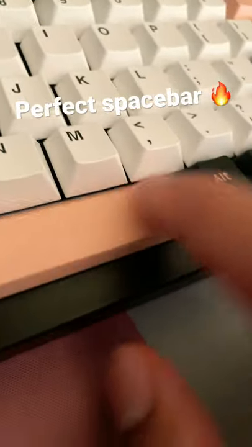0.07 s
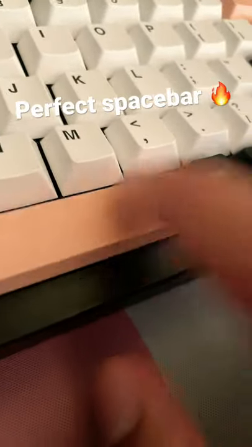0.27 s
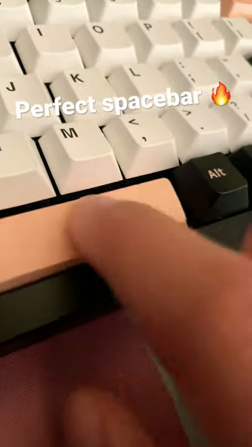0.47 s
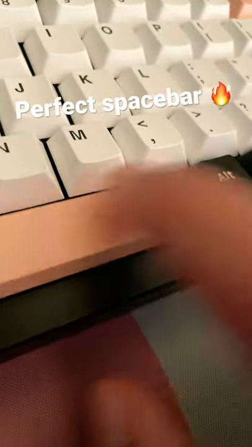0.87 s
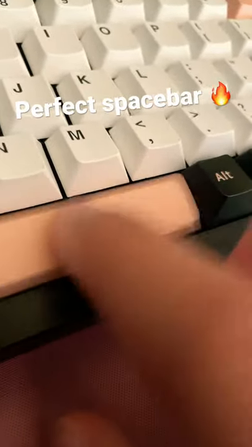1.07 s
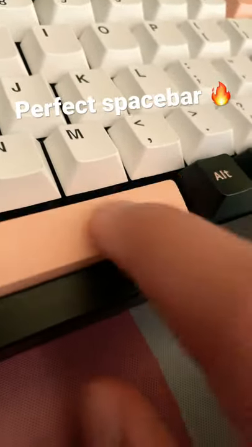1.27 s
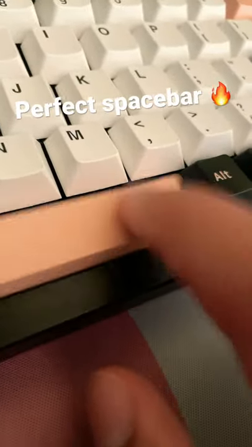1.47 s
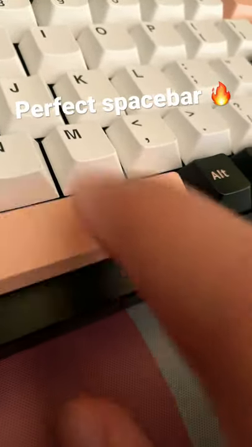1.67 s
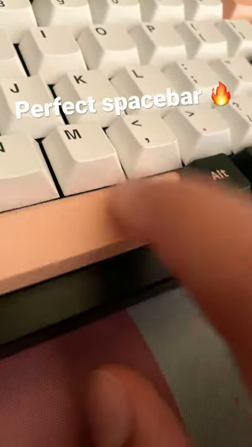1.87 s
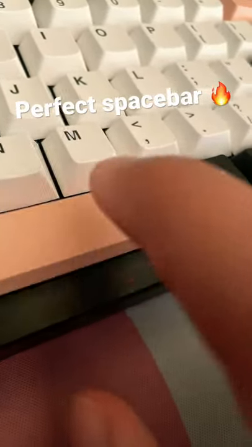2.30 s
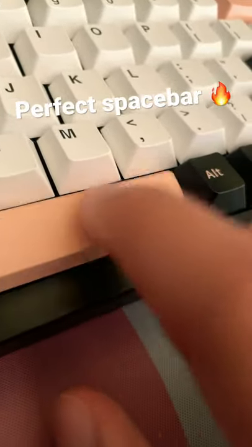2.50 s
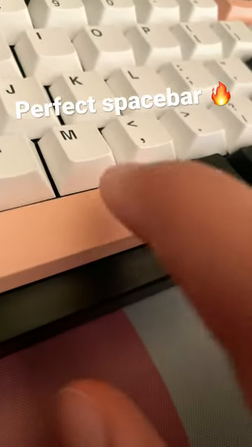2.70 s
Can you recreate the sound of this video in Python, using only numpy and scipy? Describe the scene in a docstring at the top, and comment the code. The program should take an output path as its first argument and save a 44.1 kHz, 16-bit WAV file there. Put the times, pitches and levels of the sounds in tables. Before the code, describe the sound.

A mechanical keyboard spacebar clacks close by from the start, about six presses a second. Each press is a dry, low plastic clack, followed within a tenth of a second by a lighter, hollow tick as it springs back. The run continues evenly until 2.2 seconds, pauses, then a release at 2.5 and a final press at 2.6 follow. A faint low rumble fills the small, quiet room.

```python
"""Over a low room rumble, the spacebar of a mechanical keyboard clacks close by, about six times a second. Each
press drives the bar against its bottom stop, and the impact excites damped modes of bar, plate and case. On
release the spring throws it against its top stop, where it ticks and then wobbles with a hollow knock. The
finger brushing the key adds faint rubs before some releases, and a small quiet room answers every stroke."""
import sys
import numpy as np
from scipy import signal
from scipy.fft import rfft, irfft
from scipy.io import wavfile

SR = 44100
rng = np.random.default_rng(int(sys.argv[2]) if len(sys.argv) > 2 else 0)


def transcribe(u):
    """Save the signal u as a 16-bit wav file named by the first command-line argument.

    u: samples, shape (n,) or (channels, n), limited to [-1, 1]; the rate is SR.
    q: integer samples, one column per channel.
    """
    v = np.clip(np.atleast_2d(u).T, -1, 1)
    q = np.round(v * 32767).astype(np.int16)
    wavfile.write(sys.argv[1], SR, q)


N = 125685

# spectrum of the steady room rumble: frequency_hz, relative_db
RUMBLE_COLOUR = [(20,-20),(35,-10),(50,-9),(75,-0.5),(130,2),(200,-5.5),(300,-6.5),(500,-17),(1000,-32.5),(2500,-42.5),(6000,-49.5),(13000,-51),(16000,-49.5)]
# friction spectrum of the sliding stem: frequency_hz, relative_db
STEM_COLOUR = [(200,-5.5),(600,4),(1200,-7),(2000,-8.5),(2800,-0.5),(4000,-22.5),(7500,-12.5),(10000,-38.5),(16000,-27)]
# impacts on the bottom stop: start_s, strength_db, crack_db, knock_db, ping_db, ping_hz
PRESS_STROKES = [(0.0166,-17,-6.5,4,-3,2730),(0.158,-10.5,-3,-3,1,2695),(0.3017,-2.9,-0.5,2.5,1,2720),(0.458,-5,-4.7,2.5,3.5,2757),(0.6088,-9.5,1,3.5,5.5,2734),(0.7538,-5,-4.5,1.5,-1.5,2755),(0.9103,-10,-1,6.5,6,2770),(1.068,-2.2,1.5,1,0,2820),(1.2236,-2.5,-0.8,2.5,-5.5,2700),(1.391,-3,-3.5,-0.5,1,2730),(1.5556,-1.5,-0.8,-1.5,1,2770),(1.722,-4,-2,0.5,-0.6,2807),(1.8829,-4,-3,1,-.5,2746),(2.042,-6.5,-0.5,3.5,3.5,2750),(2.2101,-6,-1.8,5,3,2735),(2.5745,-11,-2,1.5,4.1,2760)]
# modes of bar, plate and case with the key down: pitch_hz, level_db, t60_s
PRESS_MODES = [(228,-43,0.059),(310,-36.5,0.055),(429,-43.5,0.049),(895,-17.5,0.0068),(1071,-18.5,0.021),(1284,-22,0.018),(1481,-21,0.018),(1761,-33.5,0.042),(2223,-21.5,0.0067),(3560,-49,0.039),(3658,-29,0.0083)]
# spectrum of the contact crack at the bottom stop: frequency_hz, relative_db
PRESS_CRACK = [(300,-25),(1400,14.5),(3000,5.5),(4500,-1),(6000,-12),(7000,-11.5),(8200,-6),(10000,-12),(12500,-13),(16000,-28.5)]
# modes of the switch at the bottom stop: pitch_hz, level_db, t60_s
PRESS_SNAP = [(6120,-35.5,0.0062),(8130,-42,0.0067),(12500,-36.5,0.00066)]
# early reflections from desk and walls: delay_s, level_db
REFLECTIONS = [(.009,-21),(0.0197,-20.5),(0.052,-30)]
# spectrum of the room's diffuse tail: frequency_hz, relative_db
TAIL_COLOUR = [(150,0.5),(500,1.5),(1200,-5),(2800,-2),(4500,6.5),(8000,1.5),(16000,1.5)]
# impacts on the top stop: start_s, strength_db, crack_db, wobble_db, ping_db, ping_hz
RELEASE_STROKES = [(0.0704,-6.5,-2,3,5,2800),(0.2248,-6.5,7,1.6,10.5,2820),(0.3764,0,0.5,-3.4,-0.5,2520),(0.538,-1,2,-3.5,1,2616),(0.682,-10,3.5,3.4,2,2750),(.8319,-1.5,2,1.5,-0.5,2680),(0.9907,-3,1.5,-0.5,4.5,2750),(1.1543,-1,3,-2.5,4,2790),(1.313,1.3,0,-3,-5,2800),(1.479,-3,2.2,-1.5,1,2795),(1.6432,1.5,2,-2,-3,2565),(1.8117,-4,3.5,-1,1,2700),(1.9689,-7,4.5,0.5,5,2670),(2.1302,-5,4.5,-1,10.5,2710),(2.4767,0.5,2,-3.5,-1,2706)]
# modes of the free bar at its top stop: pitch_hz, level_db, t60_s
RELEASE_MODES = [(642,-34,0.031),(924,-21.5,0.0046),(1105,-20,0.014),(1310,-28.5,0.015),(1549,-24,0.016),(1778,-30,0.025),(2370,-36,0.0057),(3383,-37,.015)]
# spectrum of the contact crack at the top stop: frequency_hz, relative_db
RELEASE_CRACK = [(300,-8),(1400,19.5),(3000,5),(4300,1),(5500,3),(7300,-9.5),(8300,0.5),(10000,-5.5),(12500,-10),(16000,-44)]
# modes of the switch at the top stop: pitch_hz, level_db, t60_s
RELEASE_SNAP = [(7130,-36,0.007),(12000,-26.5,0.00049)]
# modes of the bar wobbling on its stabiliser: pitch_hz, level_db, t60_s
STABILISER_MODES = [(298.5,-27,0.03),(388.7,-32,0.046)]
# ticks of loose plastic: start_s, level_db
PLASTIC_TICKS = [(0.416,-49),(0.5033,-49)]
# rubs of the finger touching the key before a release: start_s, level_db
FINGER_RUBS = [(.813,-11),(1.143,-9),(1.304,-7),(1.468,-6.5),(1.797,-17),(1.955,-6.5),(2.118,-13),(2.462,-5)]
# spectrum of those finger rubs: frequency_hz, relative_db
FINGER_COLOUR = [(150,-7),(400,4),(1000,6),(2000,0),(4000,-13.5),(13000,-27),(16000,-17.5)]

CONTACT_S = 0.00047  # time constant over which a blow builds up


def amp(db):
    """Amplitude grows tenfold with every 20 decibels."""
    return 10 ** (np.asarray(db) / 20)


def fade(t, t60_s):
    """Damped vibration decays exponentially, by 60 dB in t60_s."""
    return np.exp(-np.log(1000) * t / t60_s)


def add(out, start_s, sound):
    """Superposition: a sound sums with those already present."""
    i = max(int(start_s * SR), 0)
    out[i:i + len(sound)] += sound[:len(out) - i]


def noise(colour, size):
    """Spectral shaping turns white noise into coloured noise, scaled to rms 1."""
    hz, db = np.array(colour).T
    bins_hz = np.maximum(np.fft.rfftfreq(size, 1 / SR), 1)
    gain = amp(np.interp(np.log(bins_hz), np.log(hz), db))
    shaped = irfft(rfft(rng.standard_normal(size)) * gain, size)
    return shaped / shaped.std()


def background(rumble_db=-58.5, hum_hz=159.4, hum_db=-64):
    """Stationary room noise: a low broadband rumble and the pure tone of a faint hum."""
    hum = np.sqrt(2) * np.sin(2 * np.pi * hum_hz * np.arange(N) / SR)
    return amp(rumble_db) * noise(RUMBLE_COLOUR, N) + amp(hum_db) * hum


def slides(level_db=-44, swell_s=0.0065):
    """Friction noise follows sliding speed, and the stem moves fastest just before each stop."""
    t = np.arange(N) / SR
    speed = np.zeros(N)
    for stop_s, db, *_ in list(PRESS_STROKES) + list(RELEASE_STROKES):
        speed += amp(db) * np.exp(-np.abs(t - stop_s) / swell_s) * (t < stop_s)
    return amp(level_db) * speed * noise(STEM_COLOUR, N)


def ring(modes, t, scatter_db=1.22, detune=0.004, bend_lag_s=0.00075):
    """An impact excites damped modes; bending waves are dispersive, so the low ones arrive later."""
    out = np.zeros(len(t))
    for k, (hz, db, t60_s) in enumerate(modes):
        gain = amp(db + scatter_db * rng.standard_normal())  # every blow differs a little
        pitch_hz = hz * (1 + detune * rng.standard_normal())
        delay_s = bend_lag_s * (np.sqrt(1000 / hz) - 0.5)
        age = np.maximum(t - delay_s, 0)
        polarity = (-1) ** k  # neighbouring modes swing in opposite directions
        out += polarity * gain * np.sin(2 * np.pi * pitch_hz * age) * fade(age, t60_s)
    return out * (1 - np.exp(-t / CONTACT_S))


def crack(colour, t, t60_s):
    """Modal overlap: the dense, quickly damped modes of colliding plastic merge into a noise burst."""
    return noise(colour, len(t)) * fade(t, t60_s) * (1 - np.exp(-t / CONTACT_S))


def snap(modes, t, detune=0.0076):
    """Impulse excitation sets the small hard parts of the switch ringing all at once."""
    out = np.zeros(len(t))
    for hz, db, t60_s in modes:
        pitch_hz = hz * (1 + detune * rng.standard_normal())
        out += amp(db) * np.sin(2 * np.pi * pitch_hz * t) * fade(t, t60_s)
    return out


def presses(t, level_db=2, knock_hz=620.7, knock_t60_s=0.051, ping_t60_s=0.027):
    """Impact on the bottom stop sets bar, case and desk into free vibration: a low clack."""
    out = np.zeros(N)
    for start_s, db, crack_db, knock_db, ping_db, ping_hz in PRESS_STROKES:
        knock = (knock_hz, knock_db - 29.5, knock_t60_s)  # hollow note of the case
        ping = (ping_hz, ping_db - 23, ping_t60_s)  # the bar's ring varies with where the finger lands
        contact = amp(-25) * crack(PRESS_CRACK, t, t60_s=0.028) + snap(PRESS_SNAP, t)
        thud = ring([(55, -47.5, 0.18)], t)  # the desk gives: pitch_hz, level_db, t60_s
        clack = ring(sorted([*map(tuple, PRESS_MODES), knock, ping]), t)
        add(out, start_s, amp(level_db + db) * (clack + amp(crack_db) * contact + thud))
    return out


def room_response(tail_db=-10, onset_s=0.0056, split_hz=4500, low_t60_s=0.23, treble_t60_s=0.2):
    """Reverberation: a few distinct reflections and a short diffuse tail whose treble dies first."""
    t = np.arange(SR // 2) / SR
    diffuse = noise(TAIL_COLOUR, len(t))
    low = signal.sosfiltfilt(signal.butter(2, split_hz, fs=SR, output="sos"), diffuse)
    tail = low * fade(t, low_t60_s) + (diffuse - low) * fade(t, treble_t60_s)
    tail *= 1 - np.exp(-(t / onset_s) ** 2)
    response = amp(tail_db) * tail / np.linalg.norm(tail)
    for delay_s, db in REFLECTIONS:
        add(response, delay_s, amp([db]))
    return response


def room(direct, stretches=24):
    """Time-varying convolution: the moving hand alters the paths, so each stretch has its own tail."""
    out = direct.copy()
    for stretch in np.array_split(np.arange(N), stretches):
        add(out, stretch[0] / SR, signal.fftconvolve(direct[stretch], room_response()))
    return out


def rebounds(t, lag_s=0.011, level_db=-38):
    """Elastic rebound: the bar touches its stop again after every stroke, with a small bright tick."""
    out = np.zeros(N)
    for start_s, db, crack_db, *_ in list(PRESS_STROKES) + list(RELEASE_STROKES):
        tick = crack(RELEASE_CRACK, t, t60_s=0.0043)
        add(out, start_s + lag_s, amp(level_db + db + crack_db) * tick)
    return out


def releases(t, level_db=-2, ping_t60_s=0.02, wobble_lag_s=0.0021):
    """The spring's restoring force throws the bar at its top stop: a tick, a light clack, a wobble."""
    out = np.zeros(N)
    for start_s, db, crack_db, wobble_db, ping_db, ping_hz in RELEASE_STROKES:
        gain = amp(level_db + db)
        ping = (ping_hz, ping_db - 30, ping_t60_s)
        contact = amp(-28) * crack(RELEASE_CRACK, t, t60_s=0.018) + snap(RELEASE_SNAP, t)
        clack = ring(sorted([*map(tuple, RELEASE_MODES), ping]), t)
        add(out, start_s, gain * (clack + amp(crack_db) * contact))
        add(out, start_s + wobble_lag_s, gain * amp(wobble_db) * ring(STABILISER_MODES, t))
    return out


def ticks(t, t60_s=0.0025):
    """A brief impact has a broad spectrum: loose plastic ticks in tiny bursts of white noise."""
    out = np.zeros(N)
    for start_s, db in PLASTIC_TICKS:
        add(out, start_s, amp(db) * rng.standard_normal(len(t)) * fade(t, t60_s))
    return out


def rubs(t, level_db=-37, rise_s=0.0028):
    """The finger brushing the key just before it lets go gives brief swells of noise."""
    out = np.zeros(N)
    swell = t / rise_s * np.exp(1 - t / rise_s)
    for start_s, db in FINGER_RUBS:
        add(out, start_s, amp(level_db + db) * noise(FINGER_COLOUR, len(t)) * swell)
    return out


def scene():
    """The spacebar's sounds superpose, reverberate in the room and join its steady background."""
    t = np.arange(SR // 5) / SR  # time within one event
    spacebar = presses(t) + releases(t) + rebounds(t) + slides() + rubs(t) + ticks(t)
    return (room(spacebar) + background())[None]


def record(dry, low_cut_hz=42, high_cut_hz=15700):
    """Band limiting: two filters remove the deep bass and the highest treble."""
    high_pass = signal.butter(6, low_cut_hz, "high", fs=SR, output="sos")
    low_pass = signal.ellip(8, 0.2, 70, high_cut_hz, fs=SR, output="sos")
    return signal.sosfilt(low_pass, signal.sosfilt(high_pass, dry))


dry = scene()
out = record(dry)
transcribe(out)
```